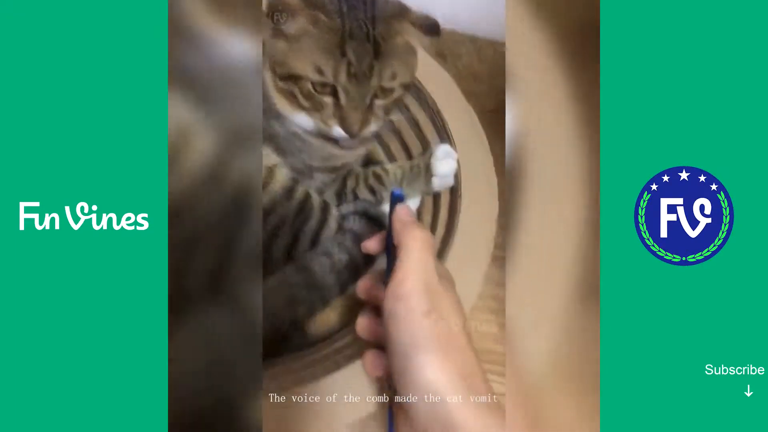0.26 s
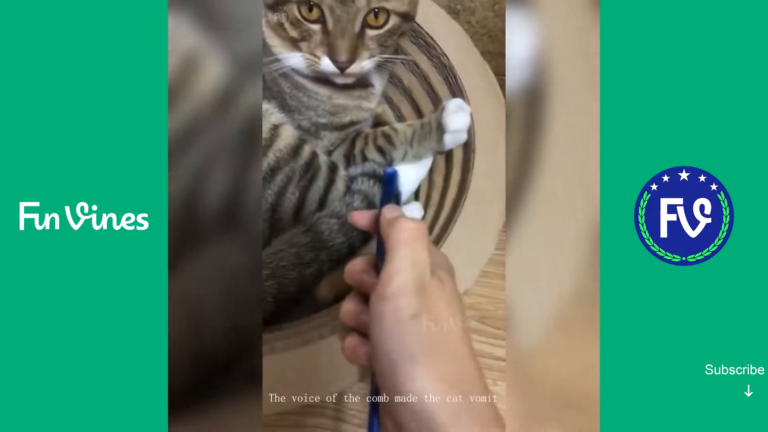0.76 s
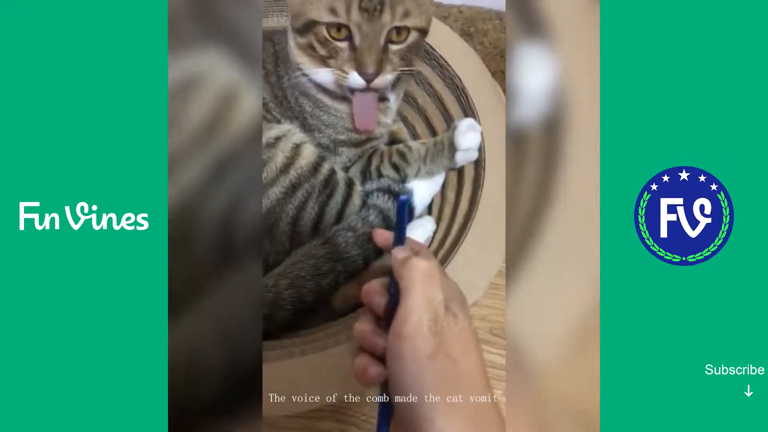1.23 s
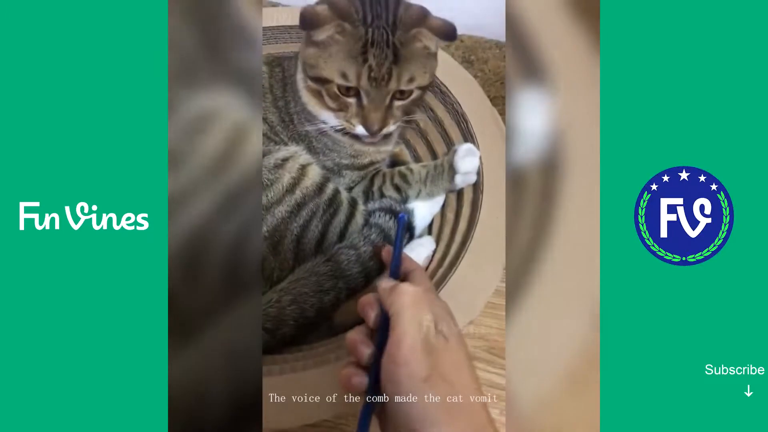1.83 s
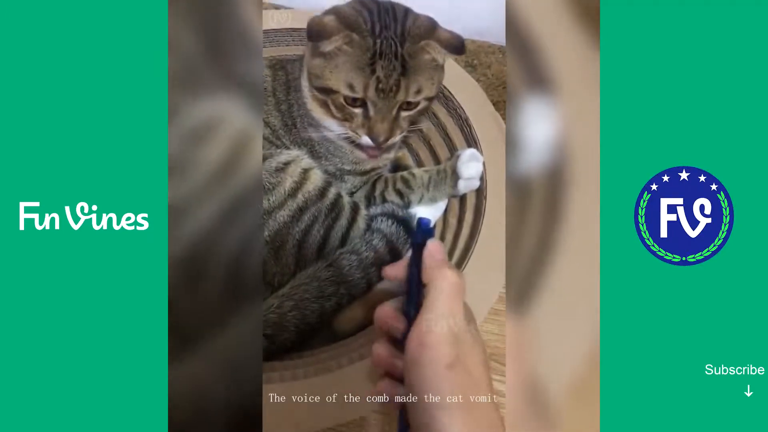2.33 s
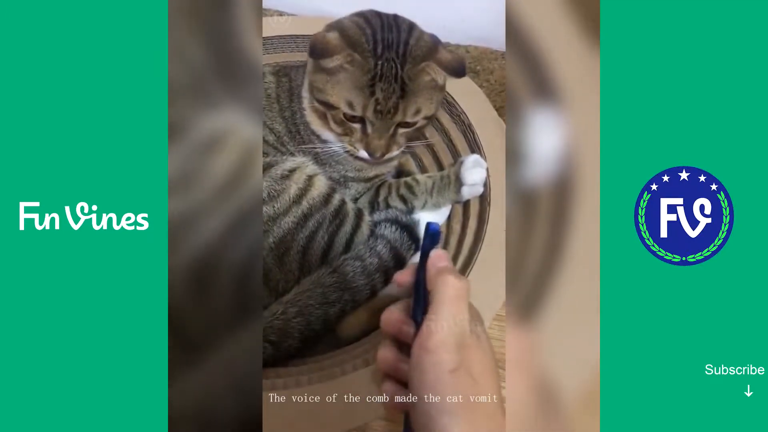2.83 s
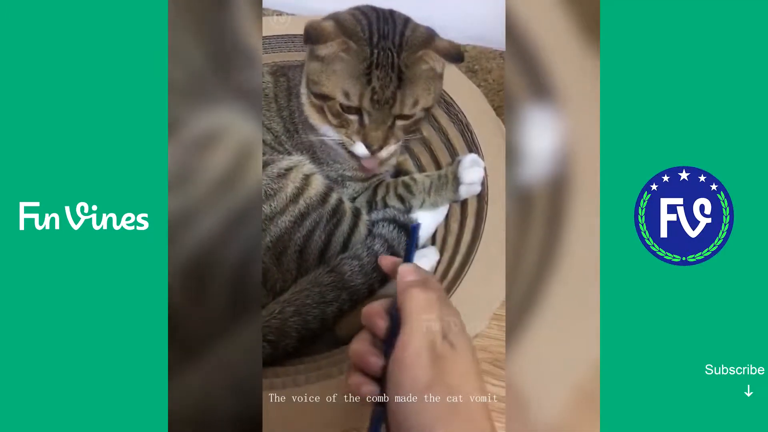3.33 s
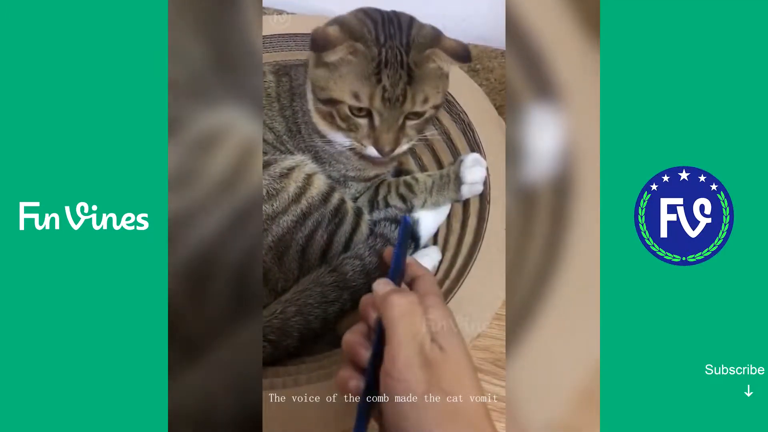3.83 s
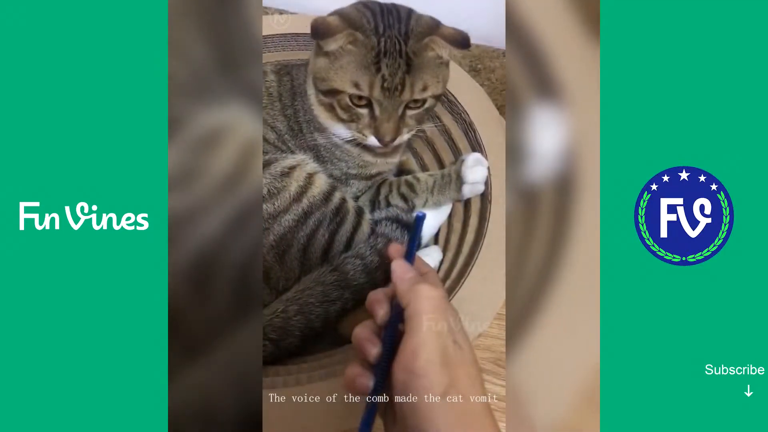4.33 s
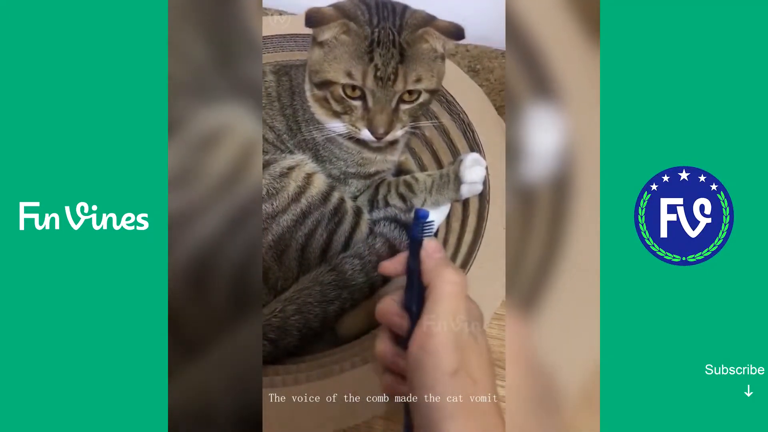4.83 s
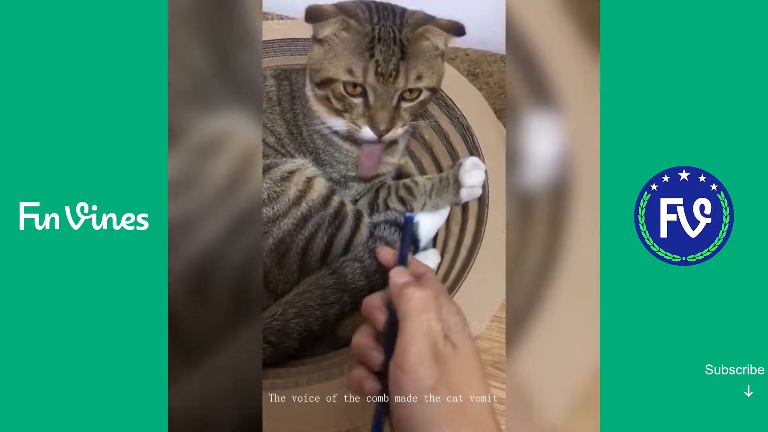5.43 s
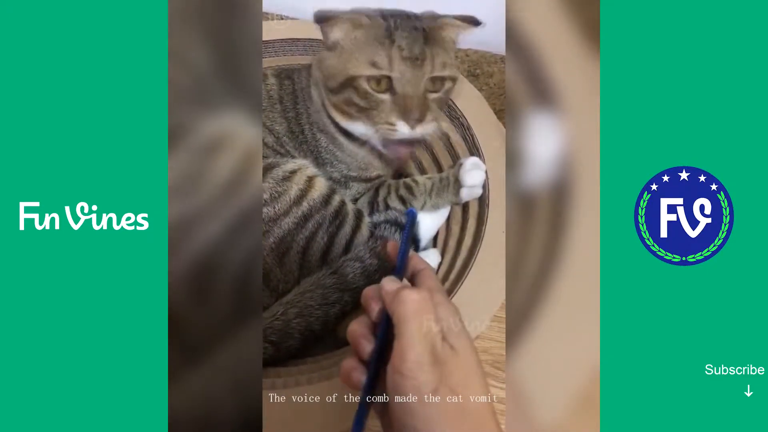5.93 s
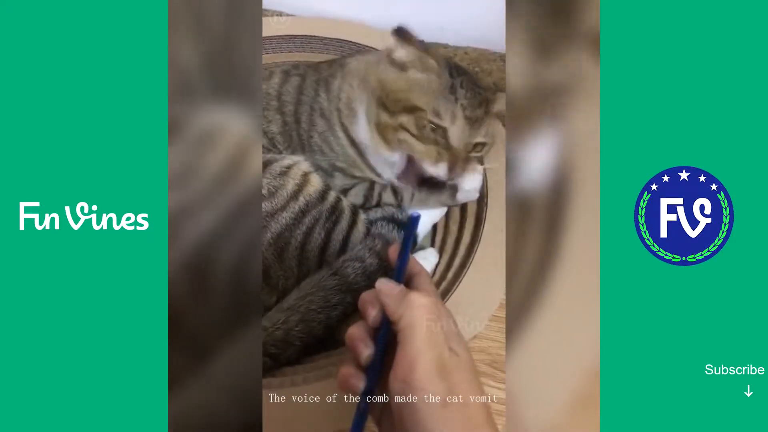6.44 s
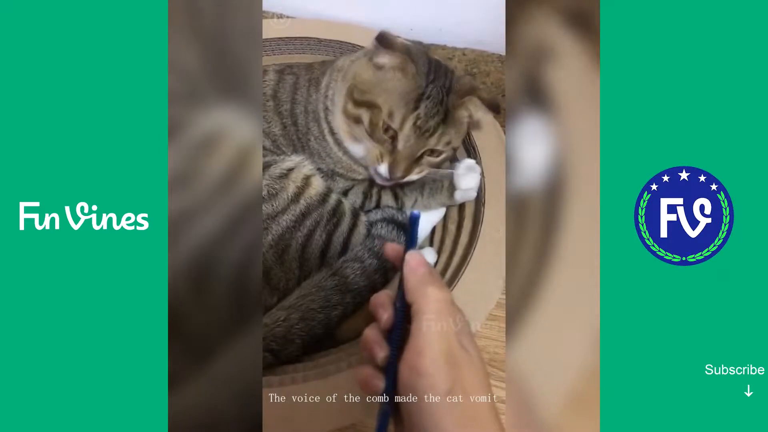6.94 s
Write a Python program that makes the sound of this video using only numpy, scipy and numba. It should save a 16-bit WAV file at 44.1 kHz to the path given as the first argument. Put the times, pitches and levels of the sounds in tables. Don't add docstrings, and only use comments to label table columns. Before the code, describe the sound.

A quiet small room, heard through a close phone microphone with noise suppression. Faint hiss, low machinery rumble and soft brushing of nail and skin come first, with a small knock at 0.15 s. From 0.7 to 2.2 s a nail releases comb teeth one by one: about eighteen loud, bright plastic snaps, irregularly spaced, each with a tiny high ring and short room reflection. A small knock follows near 2.55 s and the hiss dulls. At 3.1 s a sharp click opens the second run, whose twenty ticks are softer and mostly quicker, with stronger ones around 4.0 s, ending at 4.2 s. A faint scrape follows at 4.5 s. The third run, from 5.2 to 6.5 s, is loud again, starting fast and slowing, with light knocks and brushing near 6.3 s. Then only subdued hiss and rumble remain until about 7.2 s.

```python
import sys
import numpy as np
from scipy import signal
from scipy.fft import rfft, irfft
from scipy.io import wavfile
from scipy.ndimage import uniform_filter1d
from numba import njit

SR = 44100
rng = np.random.default_rng(int(sys.argv[2]) if len(sys.argv) > 2 else 0)


def amplitude_ratio(level_db):
    exponent = np.asarray(level_db, float) / 20
    return 10 ** exponent


def output_pcm(signal):
    pcm = np.clip(np.atleast_2d(signal).T, -1, 1) * 32767
    wavfile.write(sys.argv[1], SR, np.round(pcm).astype(np.int16))


N = 316197


def shaped(size, gain):
    hz = np.maximum(np.fft.rfftfreq(size, 1 / SR), 1)
    x = irfft(rfft(rng.standard_normal(size)) * gain(hz), size)
    return x / np.sqrt(np.mean(x ** 2))


def colour(points):
    p = np.array(points)
    return lambda hz: amplitude_ratio(np.interp(np.log(hz), np.log(p[:, 0]), p[:, 1]))


def band(centre_hz, width_hz):
    return lambda hz: 1 / (1 + ((hz - centre_hz ** 2 / hz) / width_hz) ** 2)


def fade(t, t60):
    return np.exp(-np.log(1000) * t / t60)


@njit
def ring(size, start, pole, kick):
    out = np.zeros(size)
    for k in range(len(start)):
        z, i = kick[k], start[k]
        while i < size and abs(z.real) + abs(z.imag) > 1e-5:
            out[i] += z.imag
            z, i = z * pole[k], i + 1
    return out


def modes(s, hz, db, t60, neighbour_db, scatter_db, rise):
    spread = 0.018
    luck = rng.standard_normal((len(s), 3, 3))
    which = np.arange(3)
    hz = hz[:, None] * (1 + spread * luck[:, :, 0] * which)
    level = db[:, None] + scatter_db * luck[:, :, 1] + neighbour_db * which
    kick = amplitude_ratio(level) * np.exp(3j * luck[:, :, 2])
    pole = np.exp(2j * np.pi * np.minimum(hz, .45 * SR) / SR - np.log(1000) / (t60 * SR))
    start = np.repeat((s * SR).astype(np.int64), 3)
    pole, kick = pole.ravel(), kick.ravel()
    quick = pole * np.exp(-1 / (rise * SR))
    return ring(N, np.tile(start, 2), np.append(pole, quick), np.append(kick, -kick))


def suppressor(t):
    # (opens [s], shuts [s], gain while open [dB])
    openings = [
        (-.1, 0.118, -2),
        (0.686, 2.574, -3),
        (3.08, 4.403, -2.5),
        (5.219, 6.875, -2),
    ]
    shut_level_db, sag_db, sag_s, slew_s = -9.5, -4, 0.096, 0.016
    db = np.zeros(N)
    for opens, shuts, open_db in openings:
        shut_db = shut_level_db + sag_db * (1 - np.exp(-np.maximum(t - shuts, 0) / sag_s))
        db = np.where(t < opens, db, np.where(t < shuts, open_db, shut_db))
    return uniform_filter1d(db, int(slew_s * SR))


def room_hiss():
    # (frequency [Hz], level [dB])
    hiss_spectrum = [(76, -43.5), (130, -13.5), (138, -3), (245, -1.5), (358, -9), (403, -6.5),
                     (588, -13.5), (663, -7.5), (6640, -15), (12300, -25), (15000, -35.5)]
    hiss_db, suppressed_from_hz = -56, 200
    notch_hz, notch_width_hz, notch_share = 5050, 220, .6
    hiss = amplitude_ratio(hiss_db) * shaped(N, colour(hiss_spectrum))
    narrow = signal.lfilter(*signal.iirpeak(notch_hz, notch_hz / notch_width_hz, SR), hiss)
    hiss = hiss - notch_share * narrow
    high_pass = signal.butter(1, suppressed_from_hz, "high", fs=SR, output="sos")
    upper = signal.sosfilt(high_pass, hiss)
    return hiss - upper * (1 - amplitude_ratio(suppressor(np.arange(N) / SR)))


def rumble():
    # (centre [Hz], width [Hz], level [dB])
    resonances = [(24, 5, -22.5), (44, 18, -4), (60.4, 10, 0), (106.4, 19, -9.5)]
    # (time [s], length [s], extra level [dB])
    swells = [(0.314, 0.17, 6), (1.61, 0.11, 6), (2.5, 0.22, 5), (3.65, 0.24, 5.5), (4.1, 0.23, 6.5),
              (4.75, .12, 3.5), (5.26, .12, 6), (5.92, 0.19, 4), (6.55, 0.25, 7), (7.147, 0.24, 5)]
    t = np.arange(N) / SR
    hum = sum(amplitude_ratio(db) * shaped(N, band(hz, width_hz)) for hz, width_hz, db in resonances)
    swell_db = sum(db * np.exp(-((t - s) / length) ** 2) for s, length, db in swells)
    return amplitude_ratio(-55 + swell_db) * hum


def whine():
    centre_hz, width_hz, whine_db = 8520, 120, -85
    return amplitude_ratio(whine_db) * shaped(N, band(centre_hz, width_hz))


def rustles():
    # (time [s], fall [s], centre [Hz], width [Hz], level
    # [dB])
    brushes = [
        (.1, 0.17, 426, 90.5, -63.5),
        (.3, 0.13, 8300, 9000, -67.5),
        (.33, 0.17, 2570, 2500, -70),
        (.265, 0.0049, 5400, 800, -67.5),
        (.43, 0.017, 6150, 500, -67.5),
        (4.48, 0.029, 4180, 6000, -68),
        (7., 0.1, 12000, 5000, -84),
    ]
    # (time [s], fall [s], centre [Hz], width [Hz], level [dB])
    knocks = [(.148, 0.01, 2120, 1470, -52.5), (.661, 0.0036, 2123, 840, -59),
              (1.666, 0.0031, 5000, 5000, -39), (2.561, 0.008, 1850, 2190, -49.5),
              (3.092, 0.0028, 6500, 3960, -23.5), (3.9, 0.0042, 7000, 5000, -47),
              (4.235, 0.0052, 5000, 5000, -45), (5.51, .019, 200, 121, -53), (6.25, 0.17, 2450, 493, -60),
              (6.29, 0.02, 2320, 3330, -47), (6.292, 0.011, 710, 250, -52.5),
              (6.375, .004, 5570, 1500, -46), (6.93, 0.02, 4900, 6950, -59.5)]
    t, out = np.arange(N) / SR, np.zeros(N)
    for table, rise_share in ((knocks, .28), (brushes, 0.94)):
        for s, fall, hz, width_hz, db in table:
            rise = rise_share * fall
            near = slice(max(int((s - 3 * rise) * SR), 0), min(int((s + 6 * fall) * SR), N))
            after = t[near] - s
            shape = np.where(after < 0, np.exp(-(after / rise) ** 2), np.exp(-after / fall))
            noise = shaped(2 * SR, band(hz, width_hz))[:len(shape)]
            out[near] += amplitude_ratio(db) * shape * noise
    return out


def strokes():
    # (time [s], snap peak [dB], second mode [dB], top modes [dB])
    first_stroke = [(0.6931, -10.5, -7, -9), (0.7887, -10.5, -13, -1.5), (0.866, -12, -13, 0),
                    (0.9222, -10.5, -12.5, -0.5), (0.9919, -9.5, -14.5, -1), (1.0904, -8, -18, -6.5),
                    (1.19, -7.5, -16.5, -9.5), (1.2949, -7.5, -13.5, -7.5), (1.4107, -8, -15.5, -11),
                    (1.5158, -7, -14.5, -14), (1.6082, -9.5, -10.5, -11.5), (1.6928, -7, -15, -16),
                    (1.7409, -10.5, -9.5, -11.5), (1.8029, -8, -13, -23.5), (1.9114, -10, -13.5, -20),
                    (2.08, -9, -12.5, -28), (2.1317, -12, -17, -20), (2.16, -13, -17, -19.5)]
    second_stroke = [(3.0768, -18, -11, -7), (3.0906, -14, -36, -26), (3.1202, -17.5, -18, -8),
                     (3.1956, -20.5, -12, 4), (3.2846, -18, -15.5, -2), (3.337, -18, -16.5, -7),
                     (3.3554, -18, -19, -3.5), (3.4104, -17.5, -19, -6.5), (3.46, -18.5, -13.5, -6),
                     (3.5613, -18, -12.5, -7), (3.6089, -18.5, -16.5, -4.5), (3.6491, -17, -15.5, -9),
                     (3.706, -18, -8.5, -7.5), (3.8044, -21.5, -9, -9), (3.8745, -19, -11.5, -5),
                     (3.9302, -16, -1.5, -3.5), (3.9961, -9, -13.5, -11.5), (4.0699, -13, -50, -21),
                     (4.159, -13.5, -23.5, -17), (4.2082, -19.5, -24, -23)]
    third_stroke = [(5.223, -10.5, -13, -7.5), (5.2526, -8, -20, -7), (5.2993, -9, -24, -6.5),
                    (5.357, -8.5, -23, -8), (5.4178, -10, -25, -8), (5.4607, -9, -16.5, -11),
                    (5.5297, -12, -14, -9.5), (5.593, -11, -15.5, -11.5), (5.6378, -10.5, -19.5, -14),
                    (5.7231, -9.5, -21.5, -14.5), (5.7816, -9, -23, -15), (5.8908, -8.5, -18, -15.5),
                    (5.9828, -7, -22, -18.5), (6.118, -7.5, -18, -17), (6.3497, -9, -15.5, -11.5),
                    (6.4293, -9, -17, -8), (6.471, -15, -22, -16)]
    # (number of its first tooth [-], bending mode [dB], twisting mode [dB re peak])
    grips = [
        (0, -36.5, -10),
        (0, -39, -14.5),
        (2, -36.5, -12.5),
    ]
    db_per_tooth, hurried_db, hurried_s, damped_below_db = -0.3842, -10.5, 0.025, -27
    rows = []
    for table, (first, grip_db, twist_db) in zip((first_stroke, second_stroke, third_stroke), grips):
        s, peak_db, second_db, top_db = np.transpose(table)
        tooth = first + np.arange(len(s))
        damping = np.minimum(second_db - damped_below_db, 0)
        hurry = hurried_db * np.exp(-np.diff(s, prepend=0) / hurried_s)
        bend_db = grip_db + db_per_tooth * tooth + hurry + damping
        rows.append([s, peak_db, bend_db, second_db, twist_db + 0 * s, top_db, tooth])
    return np.hstack(rows)


def cracks(s, peak_db):
    # (frequency [Hz], level [dB])
    crack_spectrum = [(250, -34.5), (600, -26.5), (1000, -26), (1500, -24.5), (1950, -26), (2400, -8),
                      (3000, -7), (3800, -8), (5600, -8), (7600, -12.5), (11300, -10), (13900, -11.5),
                      (15000, -17), (16500, -43.5)]
    snap_db, rattle_db, rattle_t60_s, rise_s = -3, -7.5, 0.02, .0006
    fresh_share = 0.79
    t, out = np.arange(2048) / SR, np.zeros(N)
    gain = colour(crack_spectrum)
    pulse = irfft(gain(np.maximum(np.fft.rfftfreq(len(t), 1 / SR), 1)))
    snap = np.roll(pulse, 40) * (t < .004)
    snap = amplitude_ratio(snap_db) * snap / np.max(np.abs(snap))
    body = shaped(len(t), gain)
    envelope = amplitude_ratio(rattle_db) * fade(t, rattle_t60_s) * (1 - np.exp(-t / rise_s))
    for at, db in zip(s, peak_db):
        rattle = fresh_share * shaped(len(t), gain) + (1 - fresh_share) * body
        first = int(at * SR)
        out[first:first + len(t)] += amplitude_ratio(db) * (snap + rattle * envelope)
    return out


def comb():
    # (tooth number [-], bending mode [Hz], second mode [Hz])
    pitch = [(0, 942, 4680), (1, 936, 4660), (3, 916, 4630), (4, 908, 4600), (5, 903, 4490), (8, 894, 4465),
             (11, 901, 4470), (15, 909, 4475), (18, 927, 4490)]
    # (multiple of the second mode [-], level [dB], t60 [s])
    second = [(1, -0.5, 0.067), (1.018, -18, 0.2), (.968, -0.5, 0.033)]
    # (multiple of the bending mode [-], level [dB], t60 [s])
    twist = [(10., 0.023, 0.019)]
    third = [(12.3, -7, 0.031), (12.58, 3.5, 0.039)]
    tip = [(14.6, -5, 0.02), (15., -1.5, 0.023), (15.35, -2, 0.032), (15.9, -18, 0.03)]
    # (tooth number [-], twisting mode [dB], tip modes re third mode [dB])
    tooth_levels = [(0, -9, 4), (1, -4.5, -3.5), (4, 0, 1), (7, 3, 3.5), (13, -3, 6), (16, -3.5, 6),
                    (19, 3, 7)]
    # (frequency [Hz], level re peak [dB], t60 [s])
    spine = [(1819, -40.5, 0.046), (2930, -33, 0.074), (3111, -32.5, 0.035), (5305, -18.5, 0.01444),
             (6715, -17, 0.0073), (10030, -25.5, 0.036)]
    rise_s, scatter_db = 0.00086, 1.5
    notch_hz, notch_width_hz = 4895, 540

    s, peak_db, bend_db, second_db, twist_db, top_db, tooth = strokes()
    at, bend_hz, second_hz = np.transpose(pitch)
    bend_hz, second_hz = np.interp(tooth, at, bend_hz), np.interp(tooth, at, second_hz)
    at, twist_by_tooth, tip_by_tooth = np.transpose(tooth_levels)
    twist_db = twist_db + np.interp(tooth, at, twist_by_tooth)
    tip_db = top_db + np.interp(tooth, at, tip_by_tooth)

    out = cracks(s, peak_db)
    out = out + modes(s, bend_hz, bend_db + 2.0, 0.16, -18, 0, 0.00084)
    # (partials, reference Hz, level dB re peak, neighbour dB, scatter dB)
    families = ((second, second_hz, second_db, -11, 0),
                (twist, bend_hz, twist_db, -2.5, 0),
                (third, bend_hz, top_db - 5, -9, 0),
                (tip, bend_hz, tip_db - 6.5, -2.5, scatter_db))
    for partials, base_hz, share_db, neighbour_db, scatter in families:
        for multiple, db, t60 in partials:
            level = peak_db + share_db + db
            out = out + modes(s, multiple * base_hz, level, t60, neighbour_db, scatter, rise_s)
    for hz, db, t60 in spine:
        out = out + modes(s, hz + 0 * s, peak_db + db, t60, -2.5, scatter_db, .0006)
    return signal.lfilter(*signal.iirnotch(notch_hz, notch_hz / notch_width_hz, SR), out)


def room(x):
    room_db, gap_s, low_t60_s, high_t60_s = -10, .003, 0.18, 0.17
    t = np.arange(SR // 2) / SR
    low = shaped(len(t), lambda hz: 1 / (1 + (hz / 5000) ** 4))
    high = shaped(len(t), lambda hz: 1 / (1 + (5000 / hz) ** 4))
    tail = (0.42 * low * fade(t, low_t60_s) + high * fade(t, high_t60_s)) * (t > gap_s)
    return signal.fftconvolve(x, amplitude_ratio(room_db) * tail / np.sqrt(np.sum(tail ** 2)))[:N]


def scene():
    near = comb() + rustles()
    background = room_hiss() + rumble() + whine()
    return (near + room(near) + background)[None]


def thin_treble(x):
    # (frequency [Hz], level a bin must reach [dB])
    threshold = [(9000, -135), (10100, -116), (10500, -101), (10900, -116), (12300, -113), (13600, -108),
                 (14600, -101), (15300, -83.5), (16500, -75)]
    hz, _, z = signal.stft(x, SR, nperseg=1024)
    power = uniform_filter1d(np.abs(z) ** 2, size=9, axis=-2)
    need = colour(threshold)(np.maximum(hz, 1))[:, None] ** 2
    return signal.istft(z * (power > need), SR, nperseg=1024)[1][..., :N]


def top_cut(x):
    return signal.sosfilt(signal.butter(12, 16640, fs=SR, output="sos"), x)


def record(dry):
    low_pass = signal.ellip(8, .2, 70, 16500, fs=SR, output="sos")
    mix = thin_treble(signal.sosfilt(low_pass, dry))
    return top_cut(mix)


dry = scene()
out = record(dry)
output_pcm(out)
```